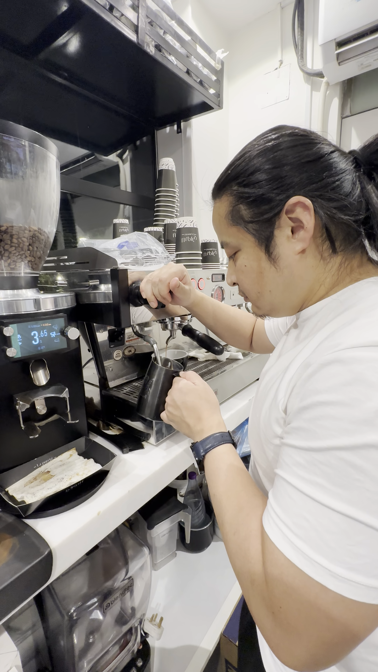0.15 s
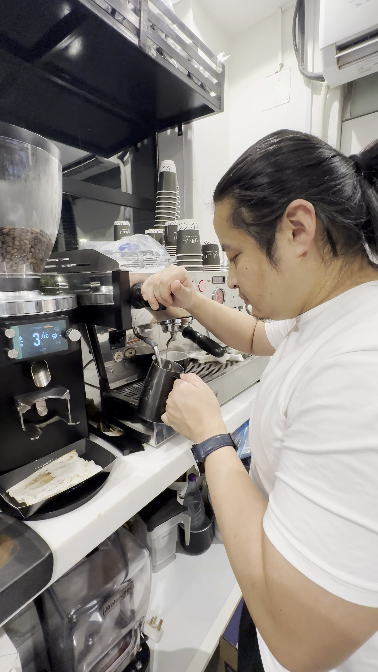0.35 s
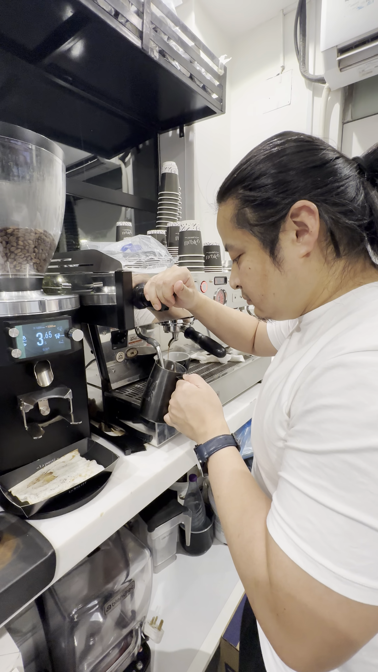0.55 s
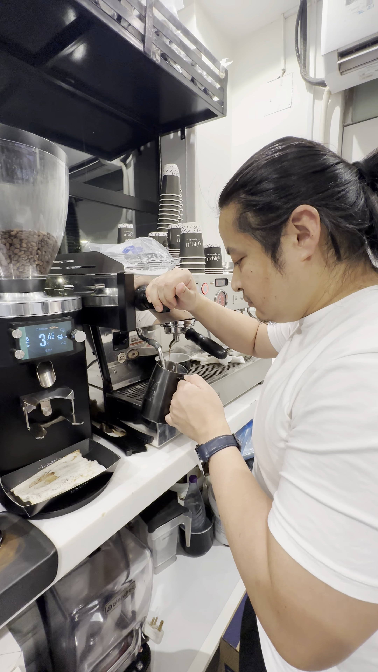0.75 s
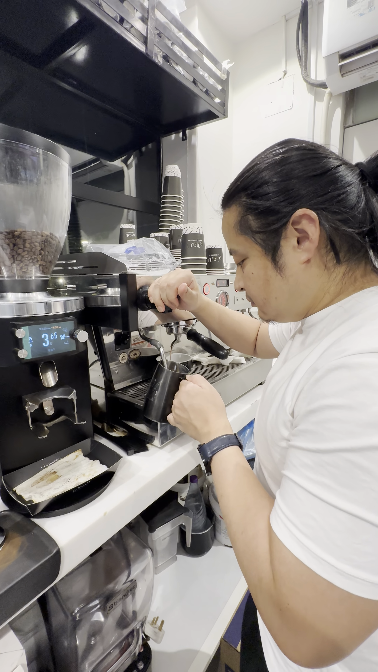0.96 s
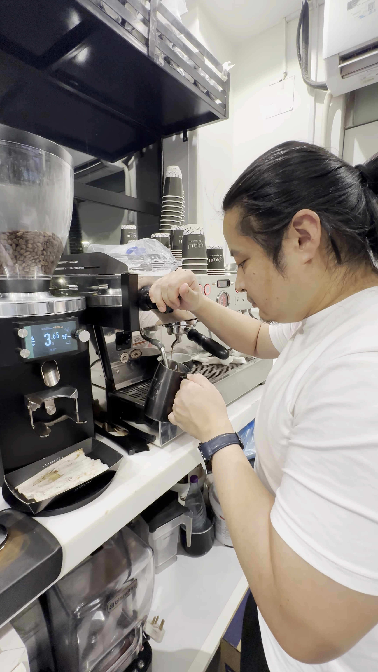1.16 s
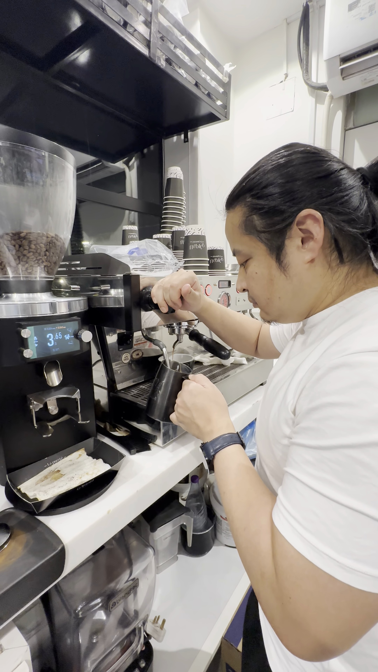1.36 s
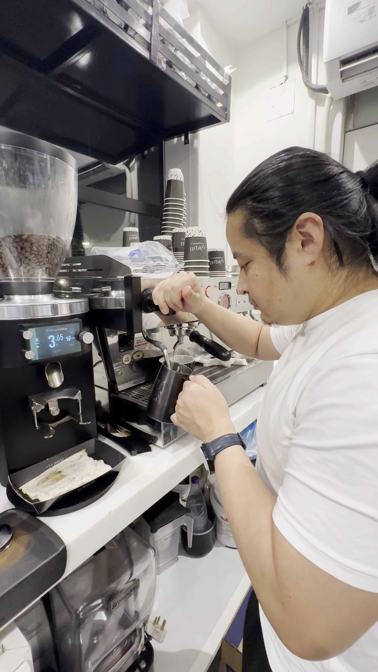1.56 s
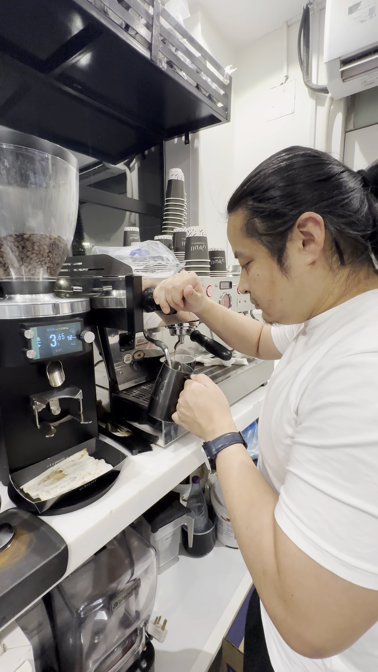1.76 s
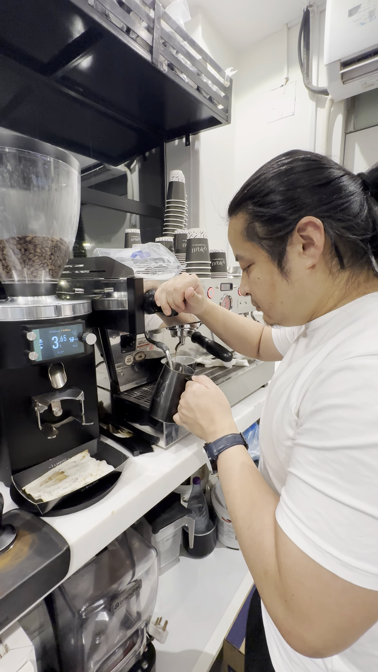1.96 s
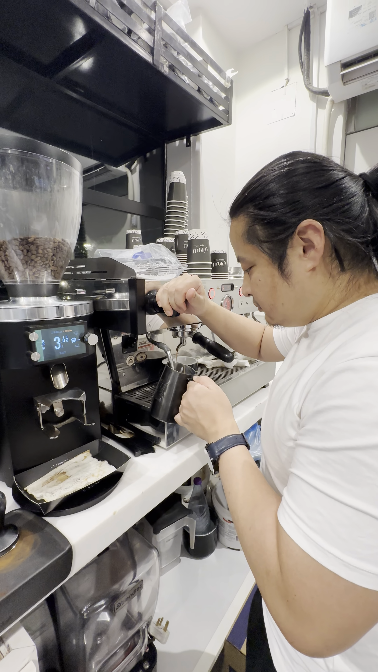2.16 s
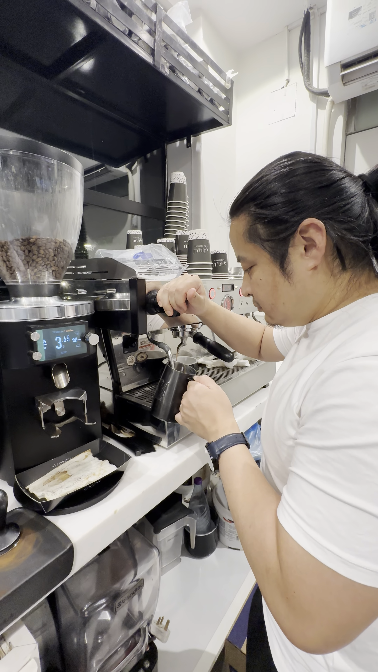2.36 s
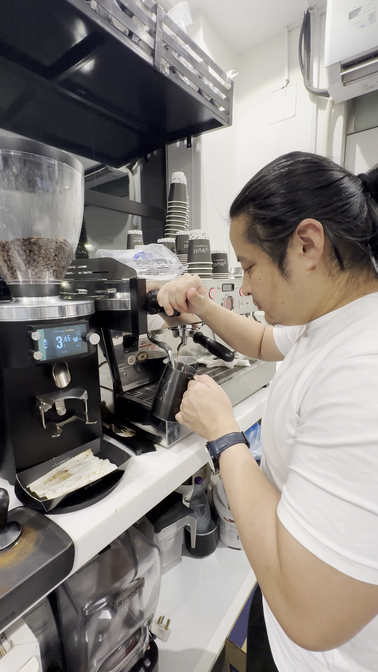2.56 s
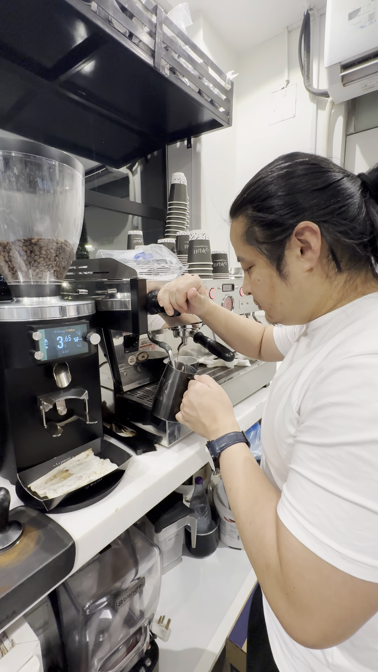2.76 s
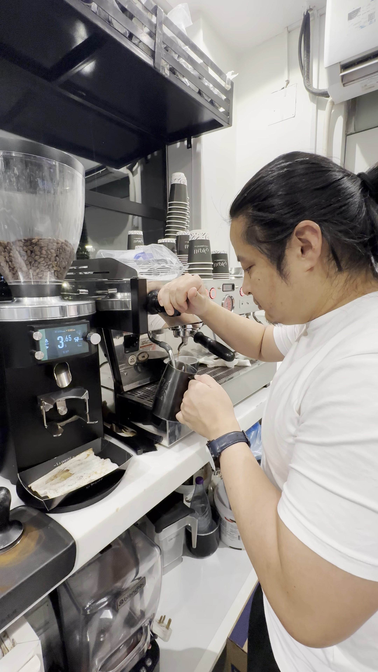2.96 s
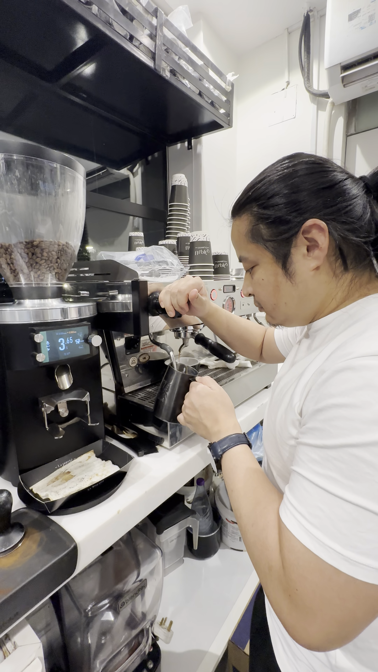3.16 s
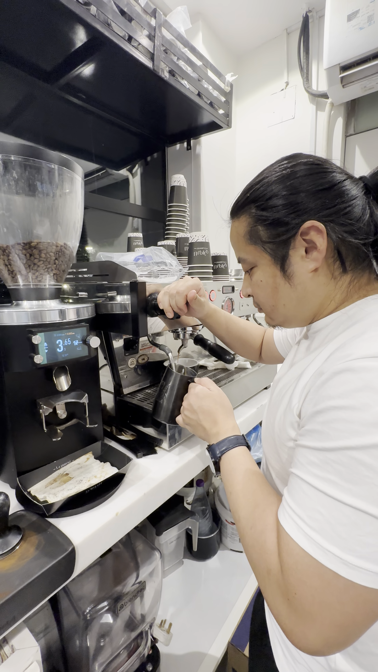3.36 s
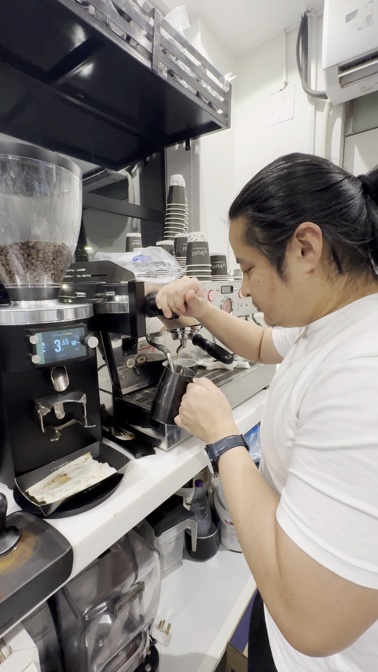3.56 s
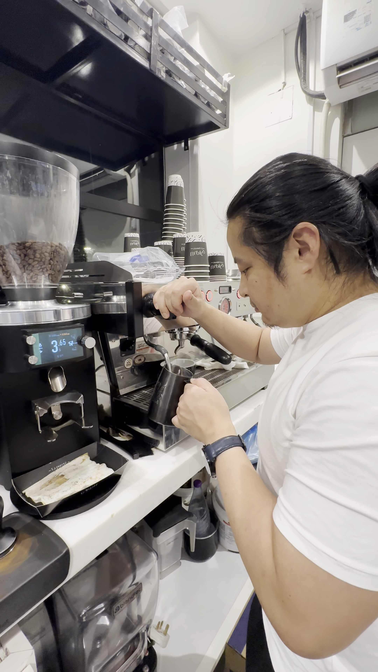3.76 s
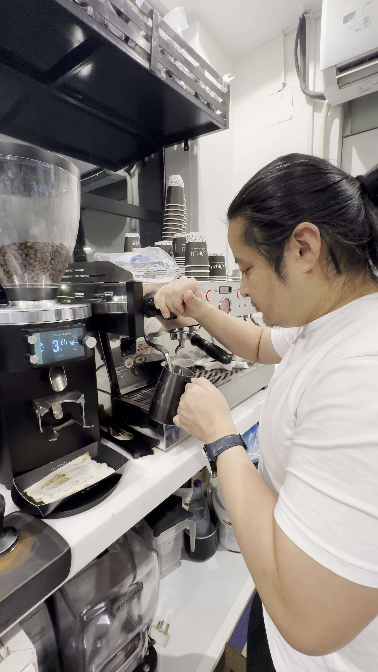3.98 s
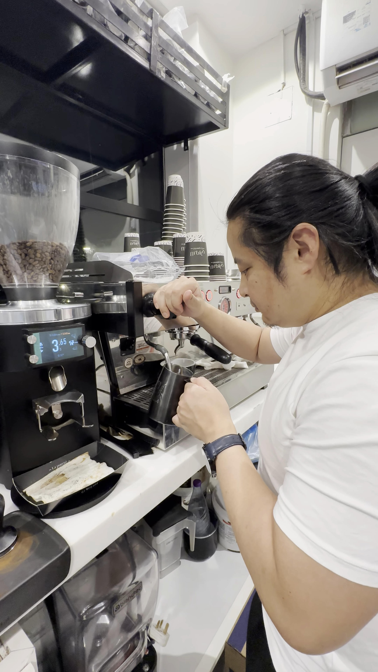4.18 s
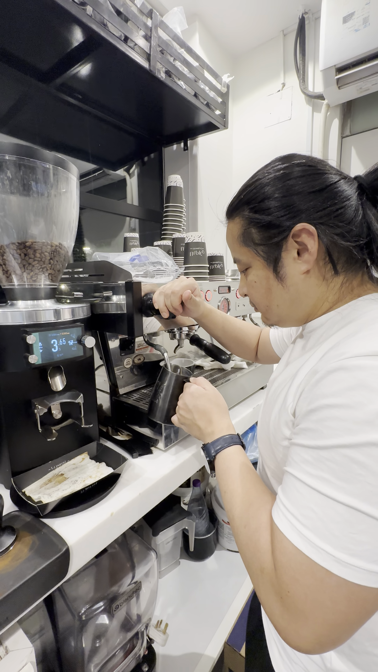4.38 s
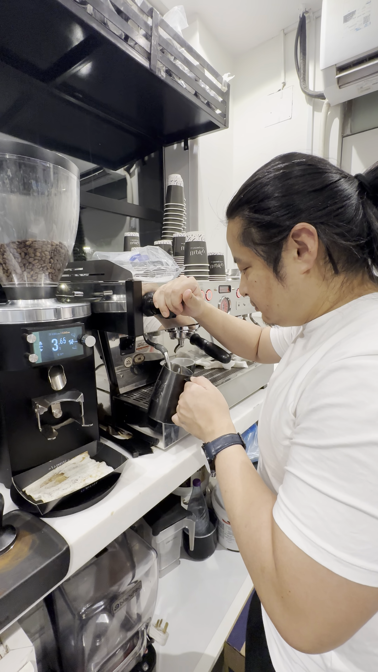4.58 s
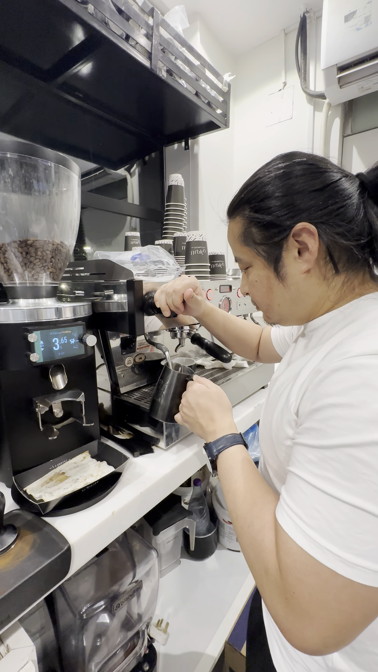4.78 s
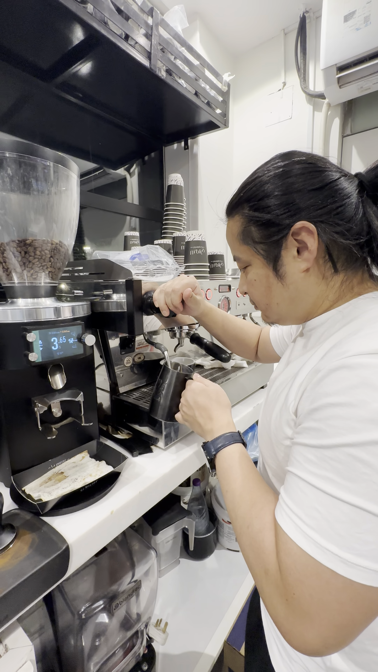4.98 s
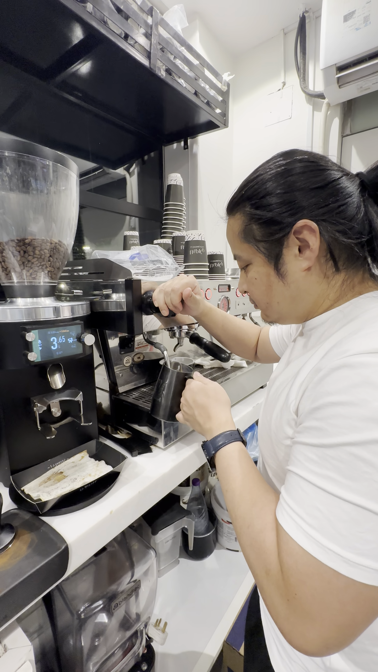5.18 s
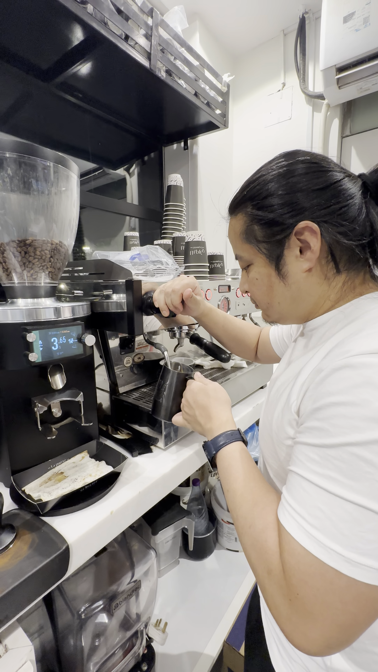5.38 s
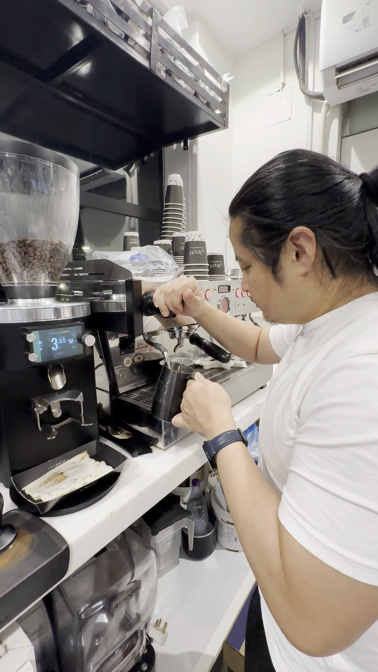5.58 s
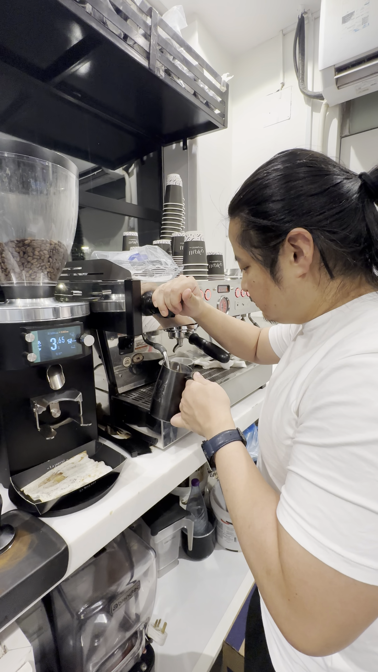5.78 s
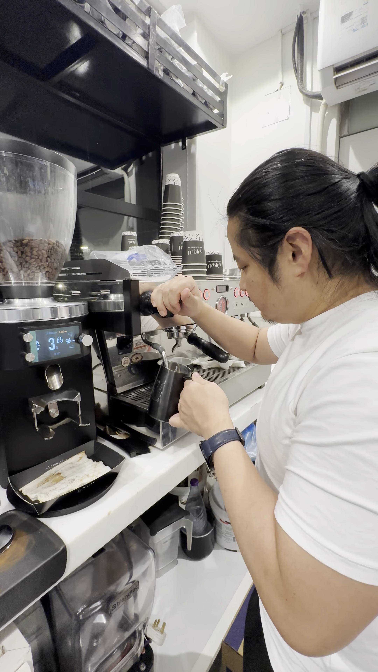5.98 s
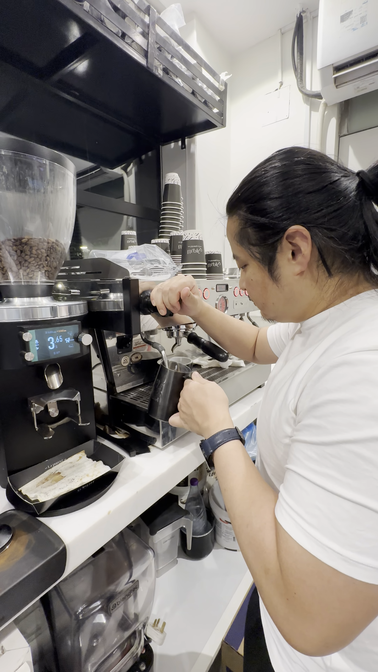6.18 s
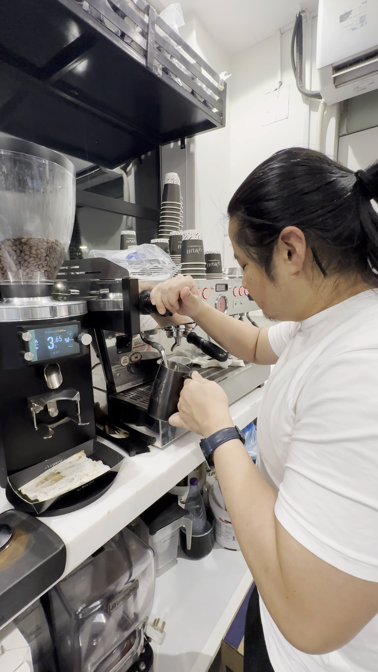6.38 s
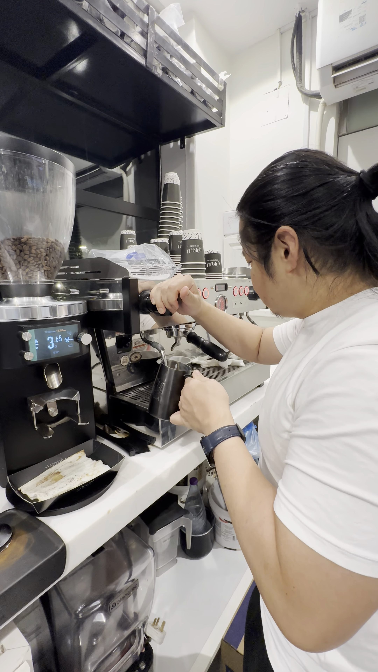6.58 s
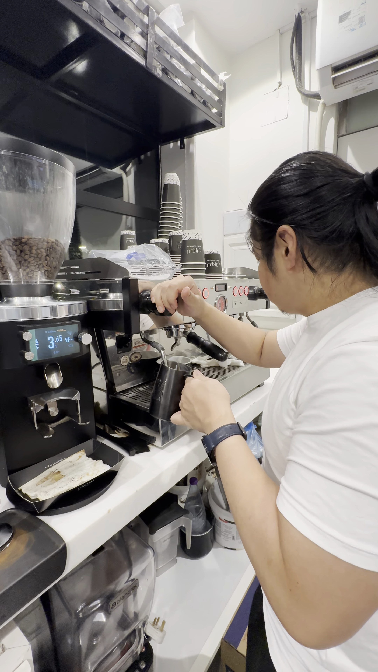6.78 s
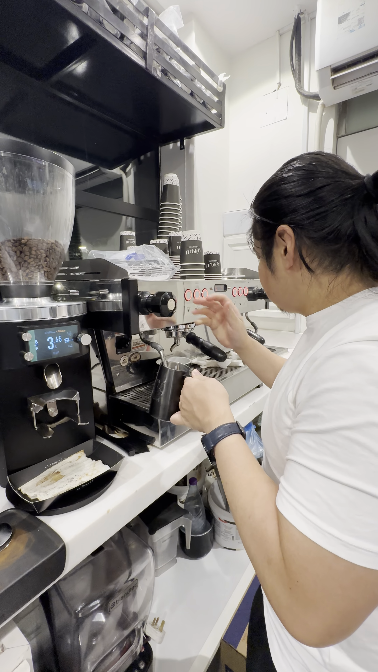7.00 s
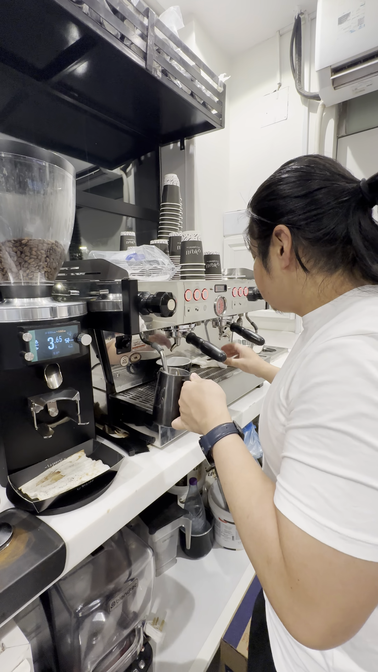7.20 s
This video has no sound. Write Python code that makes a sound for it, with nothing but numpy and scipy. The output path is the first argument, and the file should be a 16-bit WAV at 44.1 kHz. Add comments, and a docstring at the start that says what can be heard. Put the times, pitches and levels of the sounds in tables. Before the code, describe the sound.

From the start, a steam wand rushes in a steel pitcher of milk, close by in a small, hard-walled cafe over low wavering hum and ventilation. Ragged wet slurps with bright spray and hollow gulps cluster at 0.1-0.3 s and 0.5-0.65 s; a sharp snap cracks at 0.84 s. The opening hiss eases over the first second. Faint spits and small round gurgles continue to about 3.6 s, with a small spit at 3.1 s as one motor tone drops out. Around 3.3-3.4 s the tip sinks: fizz falls away and a dull, even churning remains, growing fuller in the mids, with a faint narrow whine sliding from high to middle pitch. Just before 6.93 s a tiny groan and squeal swell into one loud knock, ringing metal and counter, with rattle and milk slops. Steam dies quickly after 6.95 s; low bubbles and hum remain.

```python
"""In a small, hard-walled cafe a steam wand heats milk in a steel pitcher, over the hum of the machines.
The tip first slurps air at the surface (shaped noise bursts), then sinks; the milk rolls with a dull rush
of collapsing bubbles (random impulses through resonances) and a narrow band that slides down in pitch.
When the valve shuts, the last steam collapses in one loud knock that rings pitcher and counter (decaying
sines and noise). The hum is a set of wavering tones over filtered noise. All levels are relative."""
import sys
import numpy as np
from scipy import signal
from scipy.fft import rfft, irfft
from scipy.io import wavfile

SR = 44100
rng = np.random.default_rng(int(sys.argv[2]) if len(sys.argv) > 2 else 0)


def waveform_to_disk(signal):
    """Save audio, clipped to [-1, 1], as 16-bit WAV at the path in sys.argv[1]."""
    frames = np.transpose(np.atleast_2d(signal))
    scaled = np.clip(frames, -1, 1) * 32767
    samples = np.round(scaled).astype(np.int16)
    wavfile.write(sys.argv[1], SR, samples)


N = 319284
T = np.arange(N) / SR  # time in s

# Pitcher and milk resonances: f/Hz, width/Hz, collapse rate/(1/s), cold level/dB, hot level/dB
PITCHER_MODES = [(1324, 140, 350, -10, -15.5), (1600, 320, 2000, -15, -2.5), (2160, 290, 3000, -12.5, -5),
                 (2735, 230, 3000, -16.5, -9), (3360, 180, 3000, -19, -21), (3900, 310, 4000, -16, -12),
                 (4470, 340, 4000, -16.5, -22), (5020, 250, 3400, -27, -29), (6080, 890, 3200, -18, -26.5)]
# Rush of the whirling milk: f/Hz, level/dB per Hz
MILK_SPECTRUM = [(100, -15), (300, 1.5), (700, 1), (1050, -0.5), (1800, -6.5), (2600, -13), (3400, -18),
                 (4600, -21.5), (6500, -32), (8500, -37), (10200, -23.5), (12000, -57), (16000, -32)]
# Falling pitch of the growing steam bubbles: t/s, f/Hz, level/dB against the whirl
SINGING_TRACK = [(3.3, 4800, -32), (3.95, 4300, -22), (4.4, 4200, -19), (4.72, 4100, -15), (5.1, 3950, -24),
                 (5.4, 2946, -21), (6.0, 2830, -17), (6.55, 2787, -9.5), (6.9, 2750, -15)]
# Fizz of air at the tip: f/Hz, level/dB per Hz
FIZZ_SPECTRUM = [(1000, -9), (3000, 1.5), (4500, -2), (7000, -8), (9000, -1), (10500, 0), (12500, -9),
                 (15500, 1.5)]
# Slurps as the tip breaks the surface: t/s, length/s, fine spray level/dB, coarse spit level/dB
SLURPS = [(0.122, 0.014, -35, -40.5), (0.144, 0.015, -21, -37), (0.176, 0.03, -22, -43),
          (0.233, 0.012, -33, -40.5), (0.252, 0.028, -38.5, -44.5), (0.471, 0.041, -45, -41),
          (0.56, 0.047, -19.5, -27), (0.623, 0.024, -20, -45), (0.946, 0.022, -59, -49),
          (1.168, 0.022, -63, -50), (1.609, 0.04, -56, -43.5), (3.12, 0.033, -47, -47.5)]
# Fine spray, coarse spit and hollow gulp of a slurp: f/Hz, level/dB per Hz
SPRAY_SPECTRUM = [(2000, -21), (4000, -27), (6000, -11.5), (7500, -10.5), (9500, -2), (10200, 7.5),
                  (11100, 11.5), (11800, -11), (13000, 3.5), (15500, 2)]
SPIT_SPECTRUM = [(1000, -30), (2200, -5), (2700, -11.5), (3400, 0), (4700, 3.5), (6300, -1.5), (8000, -2.5),
                 (11000, -22), (16000, -28)]
GULP_SPECTRUM = [(400, -28), (850, 1), (1200, 4.5), (1500, 3), (1800, -14), (2200, -3), (3000, -33),
                 (8000, -46)]
# Largest single bubbles: t/s, f/Hz, level/dB, decay/s
BIG_BUBBLES = [(0.138, 2130, -31, 0.005), (0.1516, 1330, -25.5, 0.006), (0.174, 1500, -24, 0.005),
               (0.195, 1244, -28.5, 0.007), (0.458, 1270, -31, 0.0046), (0.4963, 1300, -26.5, 0.005),
               (0.5561, 1310, -29, 0.005), (0.576, 1225, -25, 0.0076), (0.577, 930, -25, 0.005),
               (0.594, 1080, -29, 0.006), (0.630, 1230, -25.5, 0.0051), (1.375, 1330, -29.5, 0.006),
               (1.8462, 1390, -33, 0.005), (2.345, 1280, -30.5, 0.0075), (2.423, 1240, -33, 0.006),
               (2.8434, 1255, -31.5, 0.0068), (3.054, 1280, -30, 0.005), (3.1275, 960, -24, 0.0031),
               (3.1275, 2280, -37, 0.004), (3.232, 1250, -30, 0.006), (3.56, 1275, -32, 0.008),
               (6.995, 822, -22, 0.011), (7.037, 648, -23.5, 0.02), (7.083, 420, -28, 0.014)]
# Films of milk bursting at the tip: t/s, level/dB, decay/s
FILM_BURSTS = [(0.1462, -22, 0.0058), (0.1961, -22, 0.006), (0.2375, -21.5, 0.0045), (0.599, -20, 0.005),
               (0.8392, -11, 0.0042), (1.634, -44, 0.0052), (3.1467, -42, 0.0065)]
# Dry snap of a film: f/Hz, level/dB per Hz
SNAP_SPECTRUM = [(1500, -26), (3000, -25), (3900, -5), (5500, -2.5), (7000, -10), (8800, -5), (10300, 10),
                 (12500, 8.5), (15500, 5.5)]
# Steam pockets collapsing as the valve shuts: t/s, level/dB, decay/s
KNOCKS = [(6.9341, -8.5, 0.0035), (6.9401, -17.5, 0.013), (6.963, -26, 0.022)]
# Crack of a collapsing pocket: f/Hz, level/dB per Hz
KNOCK_SPECTRUM = [(60, -22), (170, 0.5), (500, -6), (1000, -5), (1400, -4), (1850, -2.5), (2300, 1.5),
                  (3100, -10), (4300, -8.5), (6200, -14), (8000, -18), (10300, -14.5), (12000, -35),
                  (15500, -10)]
# Modes of wand, pitcher and counter struck by the knock: f/Hz, level/dB, t60/s, delay/s
STRUCK_MODES = [(170, -16, 0.13, 0.027), (211.8, -19, 0.15, 0.021), (309, -18, 0.2, 0.025),
                (522, -11, 0.12, 0.005), (700, -23, 0.12, 0.03), (842, -21.5, 0.17, 0.0275),
                (1345, -33, 0.23, 0.004), (1510, -30, 0.3, 0.033), (1630, -34, 0.2, 0.021),
                (1850, -23, 0.11, 0.0035), (1981, -20.5, 0.11, 0.004), (2288, -27, 0.11, 0.0019),
                (2580, -21, 0.035, 0.0005)]
# Pitcher rattling against the wand: f/Hz, level/dB per Hz
RATTLE_SPECTRUM = [(200, -9), (410, -2), (920, -7), (1150, -13), (1350, 0), (1620, -5.5), (1870, -4),
                   (2300, -10), (2900, -19), (8000, -35)]
# Milk slopping back against the pitcher: t/s, level/dB, decay/s
SLOPS = [(6.945, -21, 0.0076), (6.959, -19, 0.01), (7.001, -26, 0.01), (7.042, -29, 0.014),
         (7.085, -30, 0.024)]
# Noise of a slop: f/Hz, level/dB per Hz
SLOP_SPECTRUM = [(80, -17), (170, -7), (330, 9), (480, 1), (800, -0.5), (1200, -30), (3000, -44)]
# Mains hum and motor lines: f/Hz, level/dB
HUM_LINES = [(93.5, -51), (148.5, -49), (179.3, -53.5), (239.5, -46.5), (270, -65), (296.3, -53),
             (299, -45), (320, -58.5), (359, -55.5), (480, -61), (599.4, -56.5)]
# Further lines of the motor that drops out: f/Hz, level/dB
MOTOR_LINES = [(202.8, -47.5), (349.9, -55)]
# Swell of the lowest drone: t/s, level/dB
DRONE_SWELL = [(0, -46), (0.25, -44), (0.52, -62), (0.85, -40), (1.5, -50), (1.9, -52), (2.45, -42),
               (3.25, -49), (3.55, -60), (3.9, -41), (4.25, -43), (4.5, -49), (5.2, -46), (6.0, -52),
               (6.6, -40), (7.2, -52)]
# Ventilation rumble: f/Hz, level/dB per Hz
VENTILATION_SPECTRUM = [(20, -12), (30, -6.5), (41, -10), (70, 0), (92, 1), (190, -0.5), (320, -4),
                        (430, -9), (700, -11.5), (1200, -18.5), (3000, -35.5), (6000, -37.5), (11000, -54),
                        (16000, -45)]
# Decay times of the cafe: f/Hz, t60/s
WALL_DECAY = [(150, 1), (700, 0.23), (1500, 0.48), (3000, 0.36), (8000, 0.28), (15000, 0.12)]
# Difference between the two microphone ports: f/Hz, level/dB
PORT_DIFFERENCE = [(60, -28.5), (130, -32), (220, -23.5), (330, -17), (500, -6.5), (720, -3), (1300, -7.5),
                   (1900, -17), (2600, -3), (4400, -3), (6500, 0.5), (9000, -1), (10400, -8.5),
                   (12000, -52), (16000, -5)]

# The tip is sunk into the milk; later the valve shuts
SINK_S, SINK_TAKES_S, SHUT_S = 3.28, 0.14, 6.95
# The whirl is louder at first and settles to an even roll
ROLL_DB, ROLL_EXTRA_DB, SETTLE_S = -43, 3.5, 0.82
# Warmth of the milk (share 0-1): at first, extra step on sinking, then an even rise
COLD_HEAT, SINK_HEAT, HEAT_PER_S = 0.16, 0.1, 0.18
SING_WIDTH_HZ = 480  # rate of the random modulation that broadens the band
# Fizz: level at the surface, extra at first, drop on sinking, fading as the foam thickens
FIZZ_DB, FIZZ_EXTRA_DB, FIZZ_SINK_DB, FOAM_DB_PER_S = -53.5, 7.5, -12.5, -3
# Shares of a slurp in which the gap opens and the spit builds up; time constant of the gap snapping shut
OPEN_SHARE, SPIT_SHARE, CLOSE_S = 0.21, 0.9, 0.0028
# Thrown droplets spatter on after the gap shuts
SPATTER_DB, SPATTER_S = -7.5, 0.054
# Gulp: level under a spray of 0 dB, dB per dB of spray, time for the hollow to form
GULP_DB, GULP_SLOPE, HOLLOW_S = -24, 0.84, 0.011
# Bubbles of much the same size gurgle in the cold milk until just after sinking; spread is a share of f
GURGLE_PER_S, GURGLE_END_S, GURGLE_HZ, GURGLE_SPREAD = 28, 3.65, 1292, 0.055
GURGLE_DB, GURGLE_SCATTER_DB, GURGLE_DECAY_S = -38.5, 4.5, 0.0049
SNAP_WET_DB = -10
# The jet squeals just before the knock
SQUEAL_HZ, SQUEAL_DB, SQUEAL_RISE_S = 1650, -22, 0.008
RATTLE_DB, RATTLE_DECAY_S = -20.5, 0.041
# Mains hum and the motor tone that beats against it
MAINS_HZ, MAINS_DB, THROB_DB, BEAT_HZ, BEAT_PEAK_S = 119.7, -43, -42, 4.2, 1.13
MOTOR_ENDS_S, MOTOR_FADE_S, MOTOR_DROP_DB = 3.12, 0.19, -32
DRONE_HZ = 57.3
TOP_HZ = 15800


def rolling_milk():
    """Cavitation: collapsing steam bubbles excite a broad rush and modes whose balance shifts with heat."""
    heating_s = np.maximum(T - SINK_S, 0)
    heat = COLD_HEAT + SINK_HEAT * ramp(SINK_S, SINK_TAKES_S) + HEAT_PER_S * heating_s
    rush = unit(colour(bubbles(rate=6000, scatter_db=1.5), MILK_SPECTRUM))
    ring = 0
    for hz, width, rate, cold_db, hot_db in PITCHER_MODES:
        # two wider resonances in series have about the listed width
        once = resonate(bubbles(rate, scatter_db=0.3), hz, 1.54 * width)
        mode = unit(resonate(once, hz, 1.44 * width))
        ring = ring + mode * undb(cold_db + (hot_db - cold_db) * heat + 1.2 * walk(14))
    steam = np.exp(-np.maximum(T - SHUT_S, 0) / 0.055)
    roll_db = ROLL_DB + ROLL_EXTRA_DB * np.exp(-T / SETTLE_S) + 0.22 * walk(23)
    return (undb(-2.0) * rush + undb(-3.5) * ring + singing()) * undb(roll_db) * steam


def singing():
    """Bubble resonance: a swarm of equal bubbles rings in one narrow band, sliding down as they grow."""
    times, pitch, level = np.transpose(SINGING_TRACK)
    phase = 2 * np.pi * np.cumsum(np.interp(T, times, pitch)) / SR
    swarm = unit(walk(SING_WIDTH_HZ) * np.sin(phase) + walk(SING_WIDTH_HZ) * np.cos(phase))
    level_db = np.interp(T, times, level) + 1.4 * walk(11)
    return swarm * undb(level_db) * ramp(SINK_S, SINK_TAKES_S)


def fizz():
    """Superposition: dense small air-bubble impulses make an even hiss, far weaker once the tip is sunk."""
    surface_db = FIZZ_DB + FIZZ_EXTRA_DB * np.exp(-T / SETTLE_S)
    sunk_db = FIZZ_SINK_DB * ramp(SINK_S, SINK_TAKES_S) + FOAM_DB_PER_S * np.maximum(T - SINK_S, 0)
    hiss = unit(colour(bubbles(rate=8800, scatter_db=-2.5), FIZZ_SPECTRUM))
    return hiss * undb(surface_db + sunk_db + 0.4 * walk(14))


def slurps():
    """Gated turbulence: air tears the surface into spray and spit, and an open gap gulps as a hollow."""
    spraying = spitting = gulping = 0
    for start, length, spray_db, spit_db in SLURPS:
        opening = ramp(start, OPEN_SHARE * length)
        closed_for = np.maximum(T - start - length, 0)
        gap = opening * np.exp(-closed_for / CLOSE_S)
        spatter = undb(SPATTER_DB) * opening * np.exp(-closed_for / SPATTER_S)
        spit_shape = np.maximum(gap, spatter) * ramp(start, SPIT_SHARE * length)
        spraying = spraying + undb(spray_db) * gap
        spitting = spitting + undb(spit_db) * spit_shape
        gulping = gulping + undb(GULP_DB + GULP_SLOPE * spray_db) * gap * ramp(start, HOLLOW_S)
    spray = unit(colour(bubbles(rate=9000, scatter_db=2.5), SPRAY_SPECTRUM))
    spit = unit(colour(bubbles(rate=6000, scatter_db=2), SPIT_SPECTRUM))
    gulp = unit(colour(bubbles(rate=1400, scatter_db=2.5), GULP_SPECTRUM))
    sputter_db = 2.3 * walk(160)
    return (spraying * spray + spitting * spit + gulping * gulp) * undb(sputter_db)


def blips():
    """Free oscillation: a few big bubbles ring singly, and an uneven stream gurgles in the cold milk."""
    out = sum(blip(*row) for row in BIG_BUBBLES)
    for k, (late, size, strength) in enumerate(rng.standard_normal(size=(200, 3))):
        start = (k + 0.5 + 0.7 * late) / GURGLE_PER_S
        if start < GURGLE_END_S:
            hz = GURGLE_HZ * (1 + GURGLE_SPREAD * size)
            db = GURGLE_DB + GURGLE_SCATTER_DB * strength
            out = out + blip(start, hz, db, GURGLE_DECAY_S)
    return out


def blip(start, hz, db, decay):
    """Damped oscillation: a bubble rings briefly, its pitch creeping up as it nears the surface."""
    age = T[:SR // 5]
    envelope = (1 - np.exp(-age / 0.0014)) * np.exp(-age / decay)
    ring = envelope * np.sin(2 * np.pi * hz * age * (1 + 0.0044 * age / decay))
    return np.pad(undb(db) * ring, (max(int(start * SR), 0), N))[:N]


def snaps():
    """Impulsive release: a bursting film of milk gives a noise crack that dies in a few milliseconds."""
    envelope = sum(undb(db) * fade(s, decay, rise=0.00068) for s, db, decay in FILM_BURSTS)
    return unit(colour(rng.standard_normal(N), SNAP_SPECTRUM)) * envelope


def last_collapse():
    """Impact excitation: groan and squeal swell up to a slam that sets metal ringing and milk sloshing."""
    start = KNOCKS[0][0]

    def swell(rise):
        """Exponential growth, cut off at the slam."""
        return np.exp(np.minimum(T - start, 0) / rise) * (T < start)

    breath = resonate(resonate(rng.standard_normal(N), 1450, 1060), 1440, 900)
    groan = undb(-31.5) * swell(0.03) * unit(breath)
    squeal = undb(SQUEAL_DB) * swell(SQUEAL_RISE_S) * np.sin(2 * np.pi * SQUEAL_HZ * T)

    crack_shape = sum(undb(db) * fade(s, decay, rise=0.00014) for s, db, decay in KNOCKS)
    crack = unit(colour(rng.standard_normal(N), KNOCK_SPECTRUM)) * crack_shape
    ring = 0
    for hz, db, t60, delay in STRUCK_MODES:
        envelope = fade(start + delay, t60 / np.log(1000), rise=2 / hz)
        # the swaying milk shakes the pitch of every mode
        phase = 2 * np.pi * (hz * T + rng.random()) + 1.0 * walk(90)
        ring = ring + undb(db) * envelope * np.sin(phase)

    wash = unit(resonate(colour(bubbles(rate=2500, scatter_db=-1.5), MILK_SPECTRUM), 650, 1600))
    slosh = undb(-29.5) * fade(start + 0.015, 0.22, rise=0.0055) * wash
    slop_shape = sum(undb(db) * fade(s, decay, rise=0.0017) for s, db, decay in SLOPS)
    slops = unit(colour(rng.standard_normal(N), SLOP_SPECTRUM)) * slop_shape
    clatter = unit(colour(bubbles(rate=2500, scatter_db=0.0), RATTLE_SPECTRUM))
    rattle = undb(RATTLE_DB) * fade(start, RATTLE_DECAY_S, rise=0.0026) * clatter
    return groan + squeal + crack + ring + rattle + slosh + slops


def machines():
    """Tonal and broadband noise: pump and fridge hum over ventilation; one motor drops out partway."""
    running_db = MOTOR_DROP_DB * ramp(MOTOR_ENDS_S, MOTOR_FADE_S)
    lines = hum(HUM_LINES) + undb(running_db) * hum(MOTOR_LINES)
    drone_phase = 2 * np.pi * (DRONE_HZ * T + rng.random()) + 0.4 * walk(2.7)
    drone = undb(np.interp(T, *np.transpose(DRONE_SWELL))) * np.sin(drone_phase)
    # the motor lags the mains
    throb = beating(MAINS_HZ, MAINS_DB, THROB_DB + running_db, -BEAT_HZ, BEAT_PEAK_S)
    air = unit(colour(rng.standard_normal(N), VENTILATION_SPECTRUM)) * undb(-37.0 + 0.5 * walk(4.99))
    return np.sqrt(2) * (lines + drone + throb) + air  # a sine of rms 1 has a peak of sqrt(2)


def hum(lines):
    """Line spectrum: steady tones that waver a little in level and pitch."""
    out = 0
    for hz, db in lines:
        level = undb(db + 1.33 * walk(4.5))
        out = out + level * np.sin(2 * np.pi * (hz * T + rng.random()) + 0.32 * walk(3.7))
    return out


def beating(hz, db, other_db, beat_hz, peak_s):
    """Interference: two tones beat_hz apart swell together at peak_s and once every beat."""
    phase = 2 * np.pi * (hz * T + rng.random())
    other_phase = phase + 2 * np.pi * beat_hz * (T - peak_s)
    return undb(db) * np.sin(phase) + undb(other_db) * np.sin(other_phase)


def room(x, wet_db):
    """Reverberation: absorption by the walls gives each frequency band its own exponential decay."""
    age = T[:SR]
    noise, tail = rfft(rng.standard_normal(SR)), 0
    centres = np.geomspace(80, 16000, 12)
    for hz, weights in zip(centres, np.eye(len(centres))):
        band = irfft(noise * np.interp(bins(age), centres, weights), SR)
        decay = np.exp(-np.log(1000) * age / at_hz(WALL_DECAY, hz)) * (1 - np.exp(-age / 0.0011))
        tail = tail + band * decay / np.linalg.norm(decay)
    return x + undb(wet_db) * signal.fftconvolve(x, tail)[:N]


def scatter(x, decay):
    """Diffusion: steel and counter return a dense cloud of early reflections."""
    age = T[:SR // 4]
    cloud = rng.standard_normal(len(age)) * np.exp(-age / decay) * (age > 0.001)
    return signal.fftconvolve(x, cloud / np.linalg.norm(cloud))[:N]


def ports(direct, diffuse, lag_ms):
    """Path difference: the left of two close ports hears first; diffuse sound sets them apart."""
    side = colour(diffuse, PORT_DIFFERENCE)
    lead = np.exp(1j * np.pi * bins(direct) * lag_ms / 1000)  # half the lag on each side
    left = irfft(rfft(direct + side) * lead, N)
    right = irfft(rfft(direct - side) / lead, N)
    return np.array([left, right])


def bubbles(rate, scatter_db):
    """Shot noise: random impulses, about rate per second, of scattered size, scaled to an rms of one."""
    sizes = undb(scatter_db * np.minimum(rng.exponential(size=N), 5))
    return unit((rng.random(N) < rate / SR) * sizes * rng.standard_normal(N))


def resonate(x, hz, width):
    """Resonance: one peak of the given width, gain 1 at its centre."""
    return signal.lfilter(*signal.iirpeak(hz, hz / width, fs=SR), x)


def colour(x, spectrum):
    """Linear filtering: weight the spectrum of x by (f/Hz, level/dB) rows."""
    return irfft(rfft(x) * undb(at_hz(spectrum, bins(x))), len(x))


def at_hz(rows, hz):
    """Logarithmic pitch scale: read (f/Hz, value) rows on a log-frequency axis."""
    points, values = np.transpose(rows)
    return np.interp(np.log(hz + 1), np.log(points), values)


def bins(x):
    """Fourier analysis: the frequency in Hz of each spectral bin of x."""
    return np.fft.rfftfreq(len(x), 1 / SR)


def fade(start, decay, rise):
    """Damping: an envelope that rises at start and dies away exponentially."""
    age = np.maximum(T - start, 0)
    return (1 - np.exp(-age / rise)) * np.exp(-age / decay)


def ramp(start, length):
    """Linear transition: go evenly from 0 to 1, beginning at start."""
    return np.clip((T - start) / length, 0, 1)


def walk(rate):
    """Random modulation: straight lines join rate normal random values per second."""
    knots = rng.standard_normal(4096)
    return np.interp(T * rate, np.arange(len(knots)), knots)


def undb(db):
    """Level scale: decibels to amplitude gain."""
    return 10 ** (np.asarray(db) / 20)


def unit(x):
    """Effective value: scale to an rms of one."""
    return x / np.sqrt(np.mean(x ** 2))


def steady():
    """Superposition: rolling milk and fizz reverberate in the room, and the machines are added."""
    return undb(-1) * room(rolling_milk() + fizz(), wet_db=-5.5) + machines()


def scene():
    """Superposition: the steady rush, then slurps, snaps, bubbles and knock with their reflections."""
    rush = ports(steady(), steady(), lag_ms=0.0403)  # its diffuse part is unrelated to the direct one
    sputter = room(slurps() + blips(), wet_db=-4.5) + room(snaps(), wet_db=SNAP_WET_DB)
    sputter = ports(sputter, scatter(sputter, decay=0.011), lag_ms=0.043)
    knock = room(last_collapse(), wet_db=-8.5)
    knock = ports(knock, scatter(knock, decay=0.0074), lag_ms=0.039)
    pan_db = 0.5  # the knock is a little louder on the left
    return rush + sputter + knock * undb([[pan_db / 2], [-pan_db / 2]])


def record(dry):
    """Saturation and band limiting: round the loudest peaks, then cut the top of the spectrum."""
    rounded = np.tanh(1.22 * dry) / 1.18
    low_pass = signal.ellip(10, 0.2, 80, TOP_HZ, fs=SR, output="sos")
    return signal.sosfilt(low_pass, rounded)


dry = scene()
out = record(dry)
waveform_to_disk(out)
```